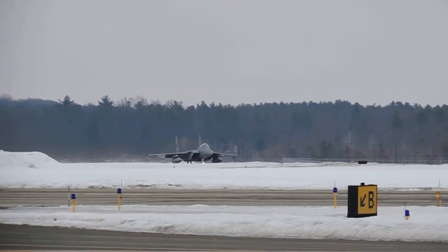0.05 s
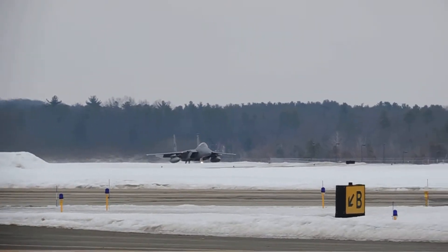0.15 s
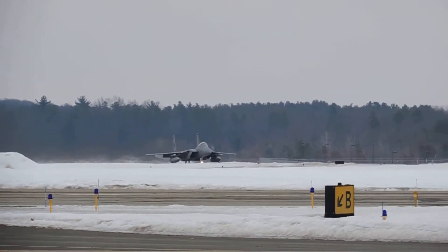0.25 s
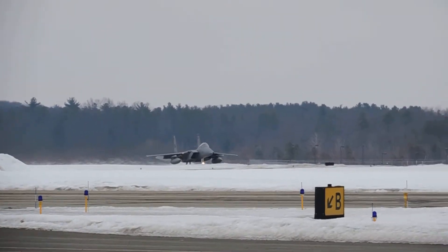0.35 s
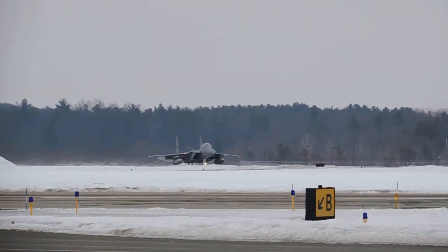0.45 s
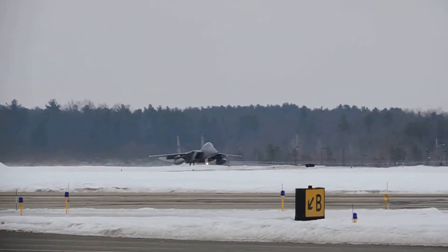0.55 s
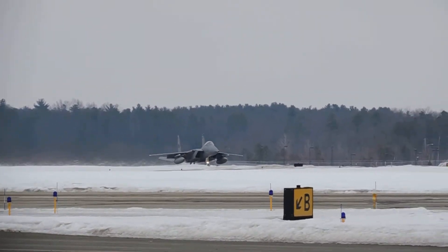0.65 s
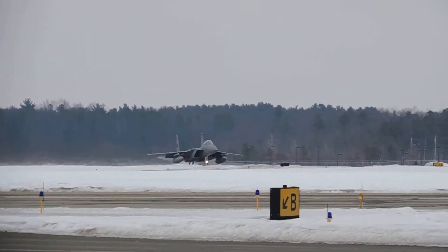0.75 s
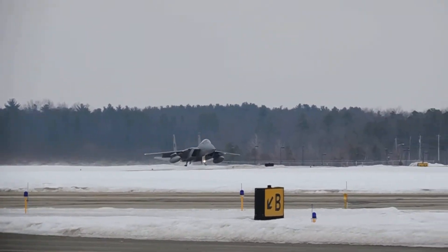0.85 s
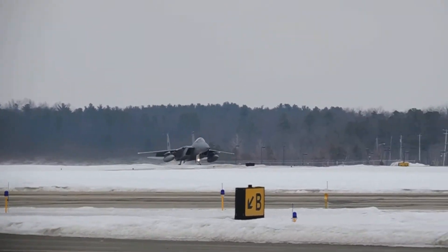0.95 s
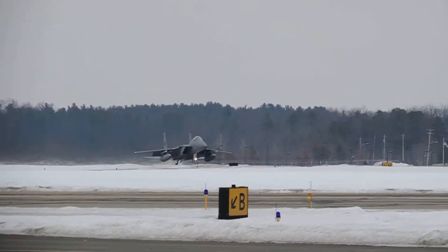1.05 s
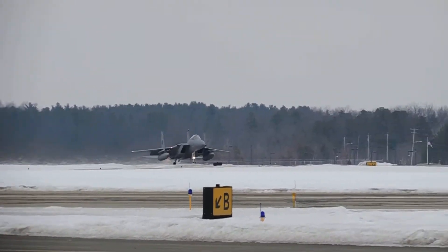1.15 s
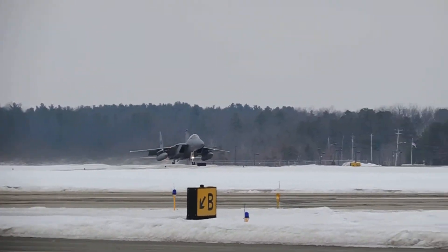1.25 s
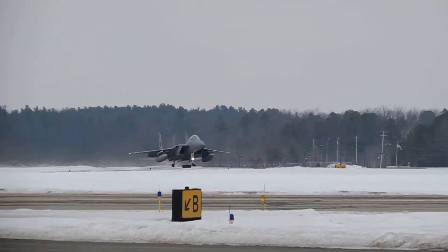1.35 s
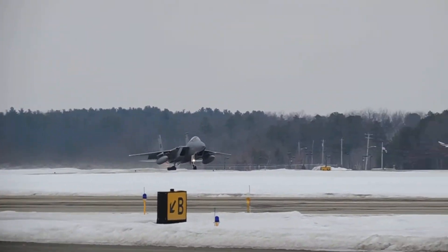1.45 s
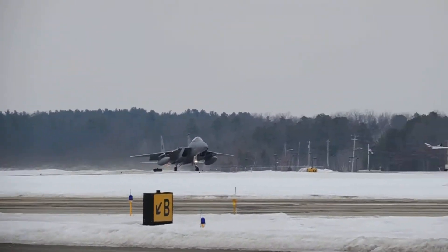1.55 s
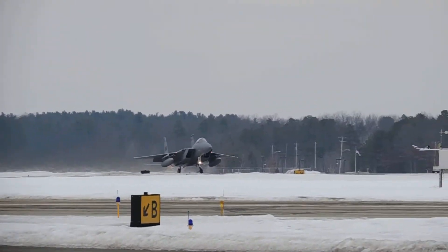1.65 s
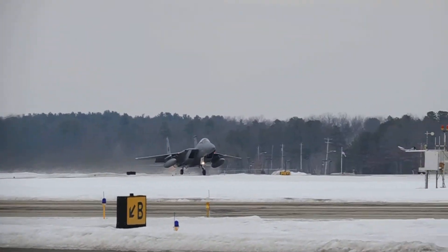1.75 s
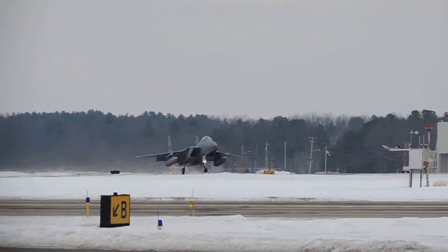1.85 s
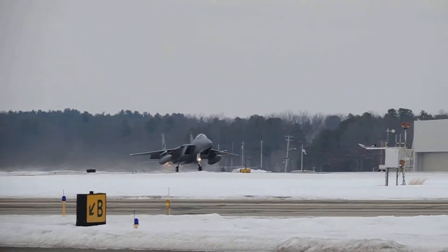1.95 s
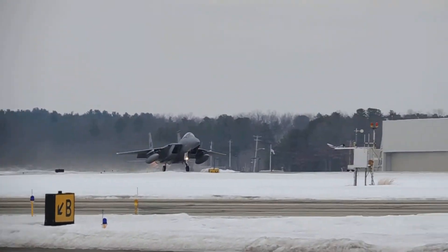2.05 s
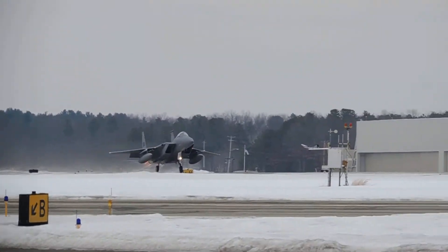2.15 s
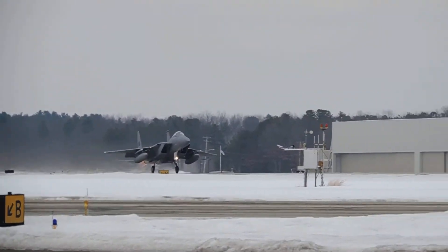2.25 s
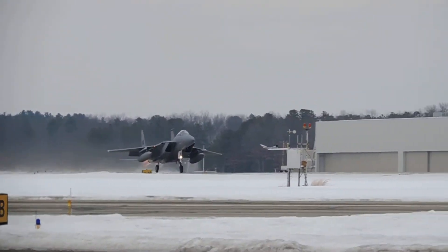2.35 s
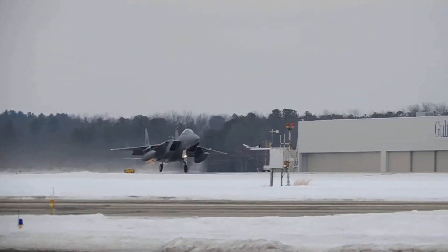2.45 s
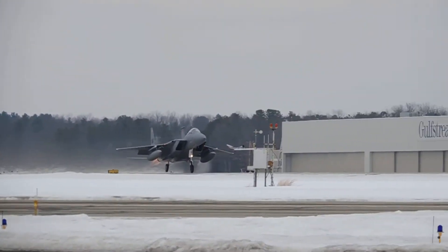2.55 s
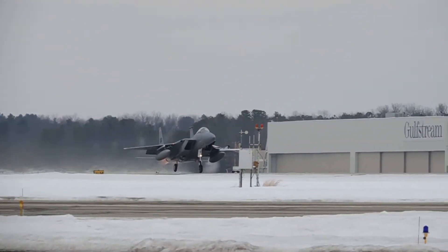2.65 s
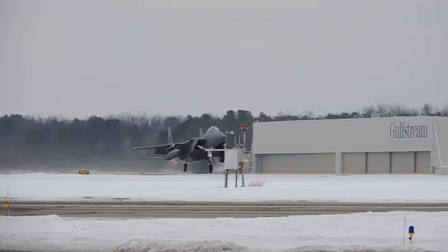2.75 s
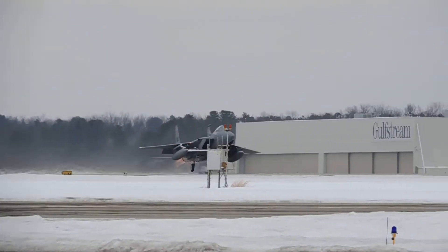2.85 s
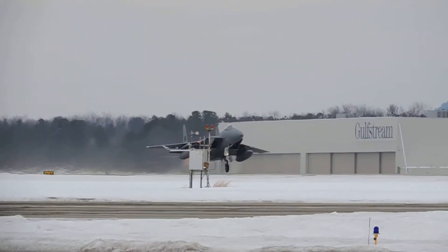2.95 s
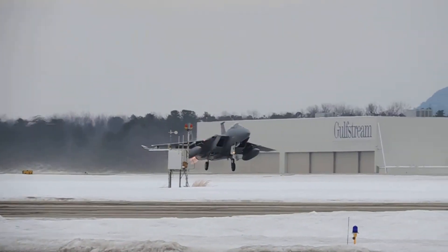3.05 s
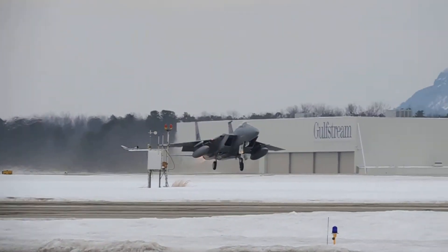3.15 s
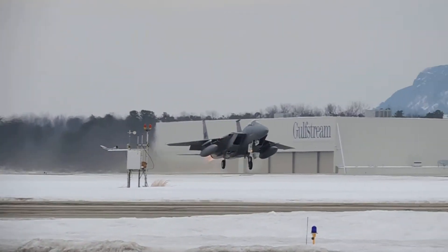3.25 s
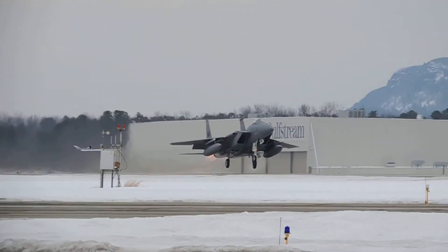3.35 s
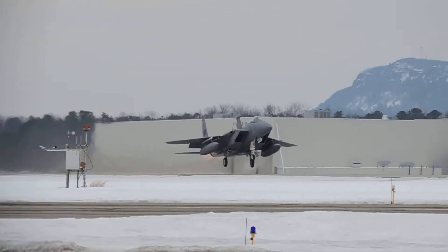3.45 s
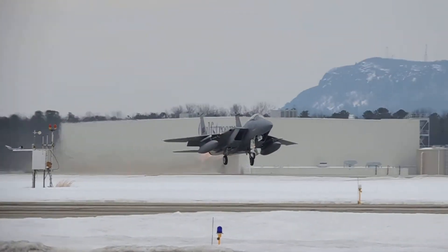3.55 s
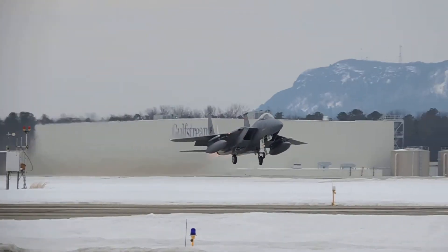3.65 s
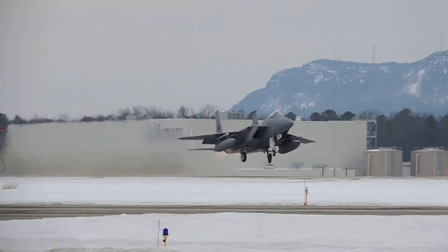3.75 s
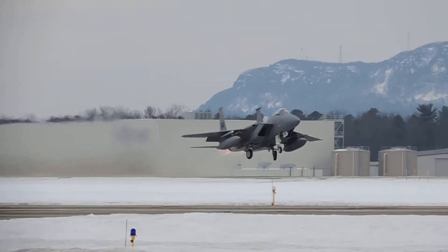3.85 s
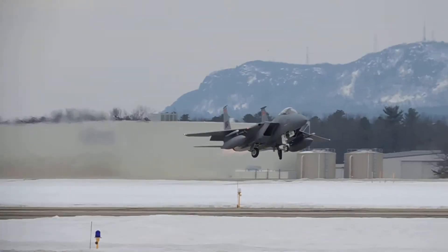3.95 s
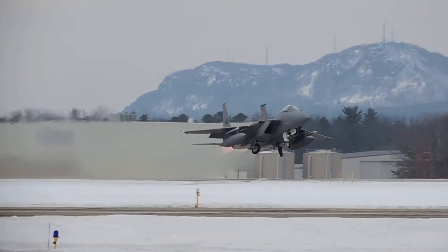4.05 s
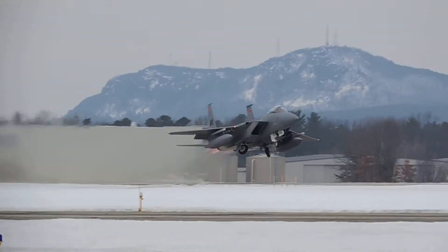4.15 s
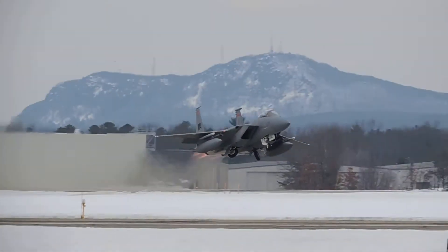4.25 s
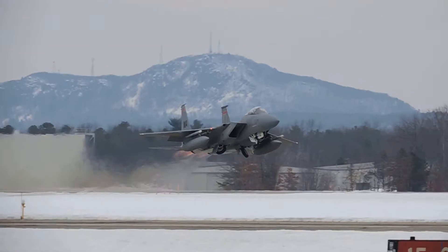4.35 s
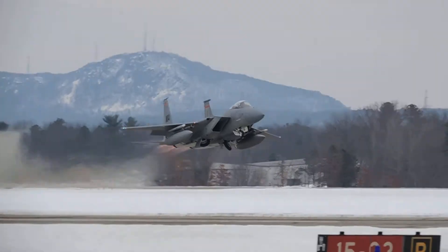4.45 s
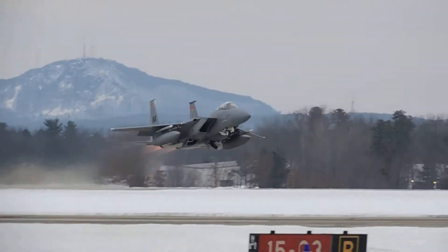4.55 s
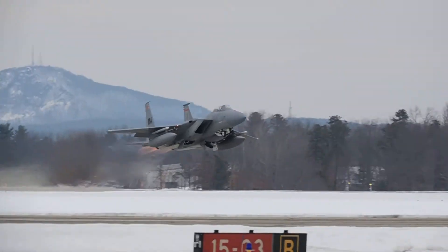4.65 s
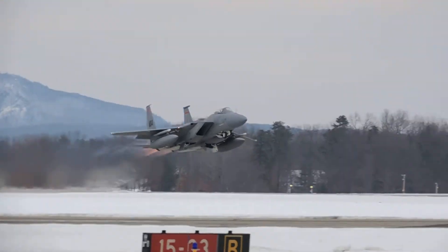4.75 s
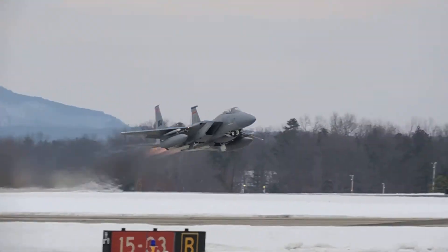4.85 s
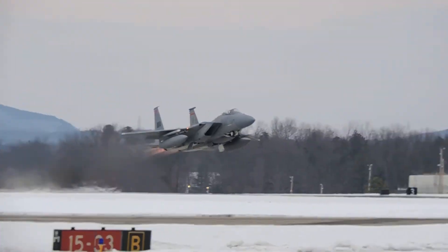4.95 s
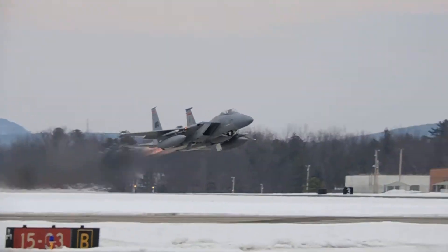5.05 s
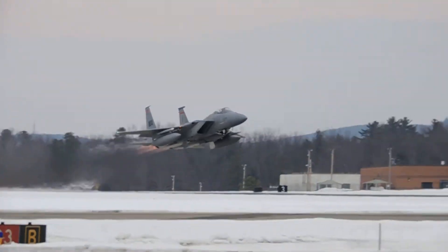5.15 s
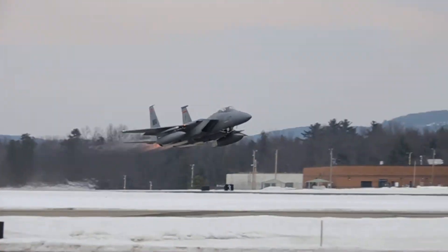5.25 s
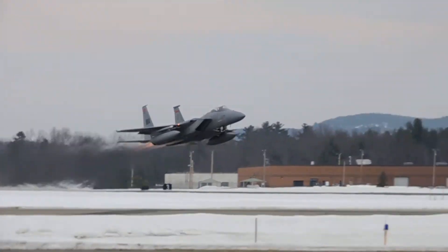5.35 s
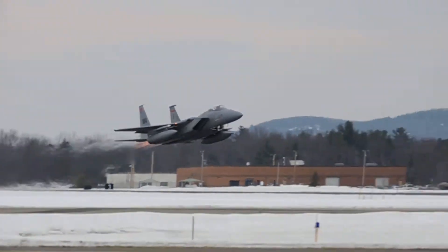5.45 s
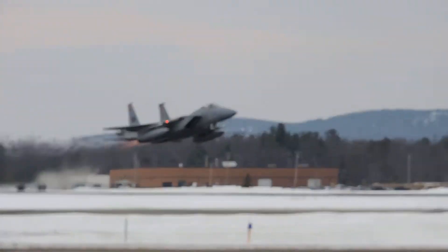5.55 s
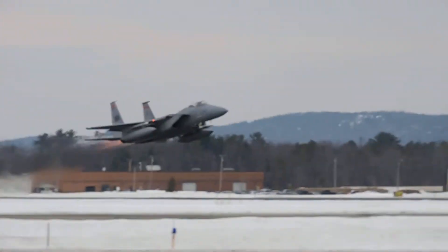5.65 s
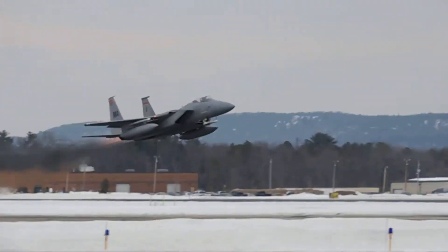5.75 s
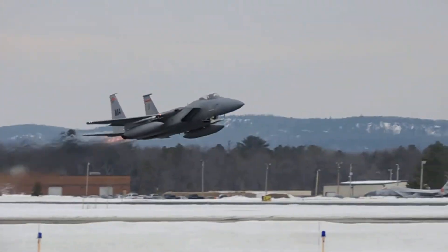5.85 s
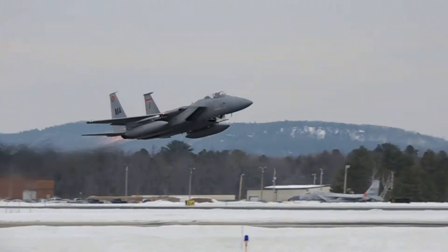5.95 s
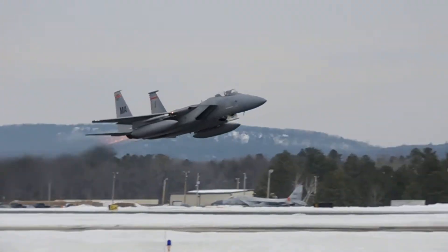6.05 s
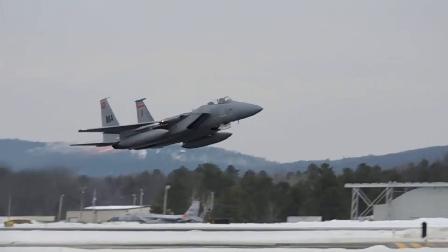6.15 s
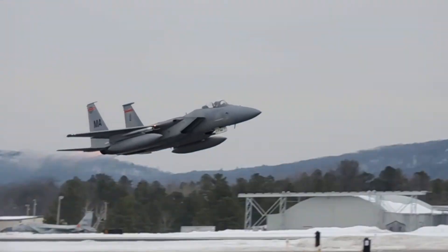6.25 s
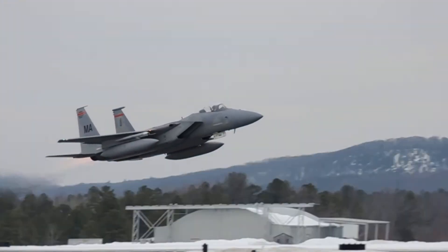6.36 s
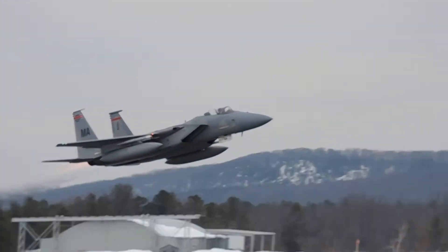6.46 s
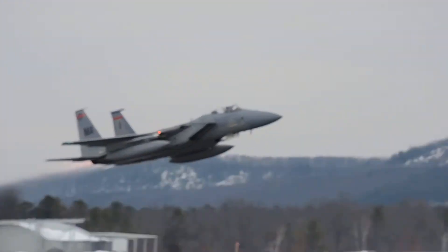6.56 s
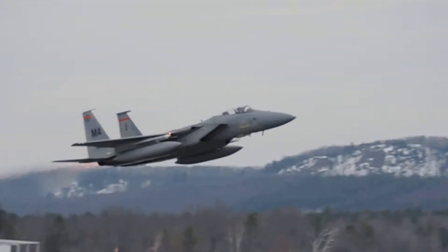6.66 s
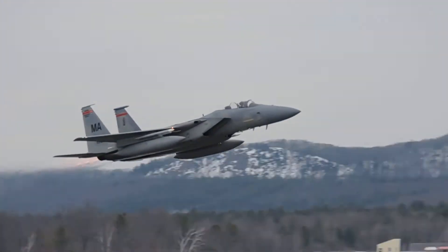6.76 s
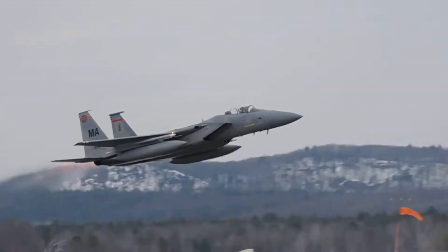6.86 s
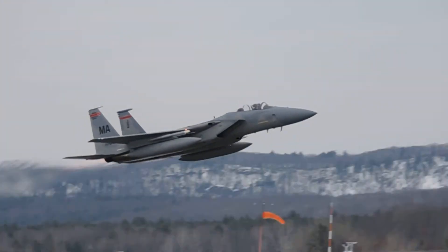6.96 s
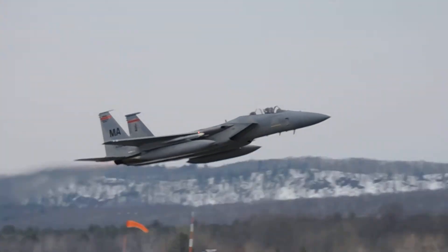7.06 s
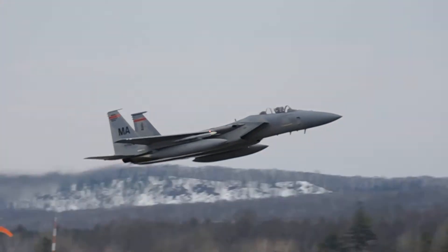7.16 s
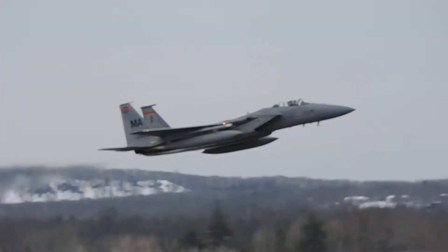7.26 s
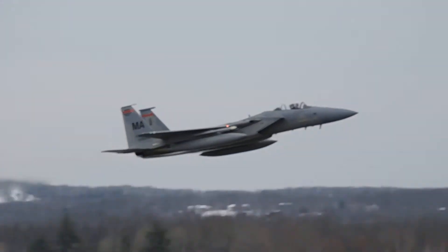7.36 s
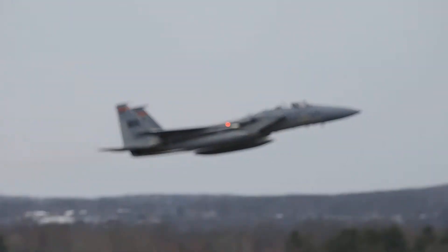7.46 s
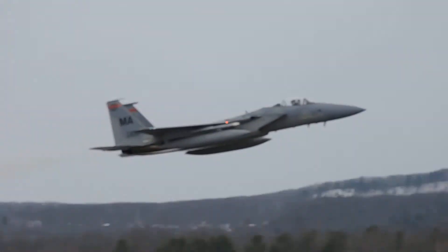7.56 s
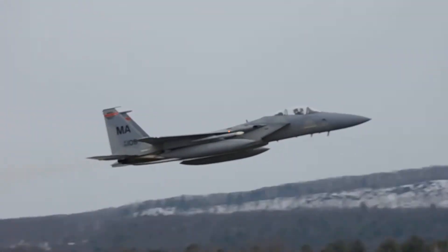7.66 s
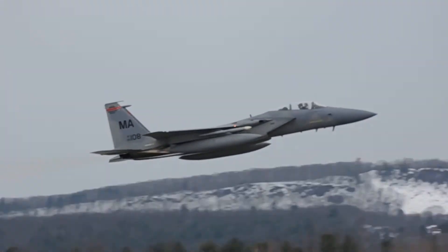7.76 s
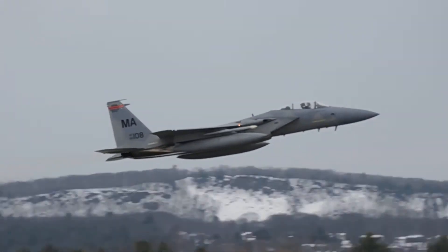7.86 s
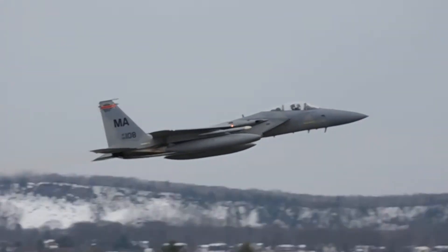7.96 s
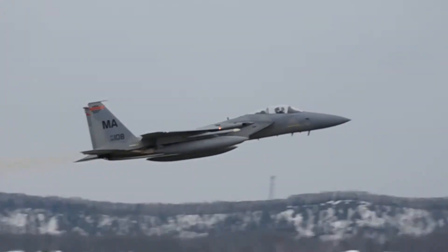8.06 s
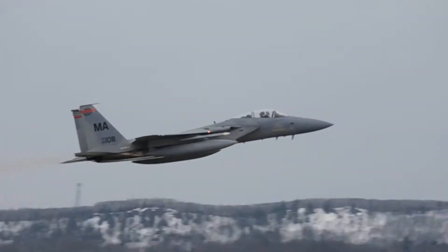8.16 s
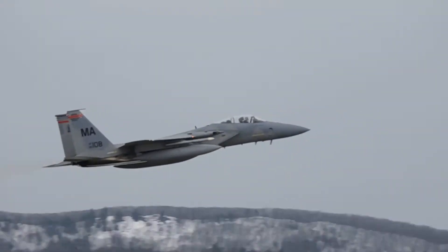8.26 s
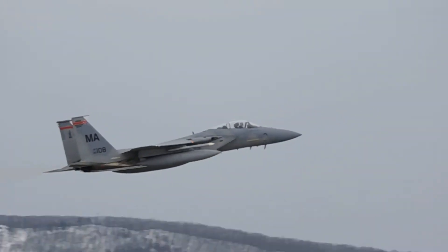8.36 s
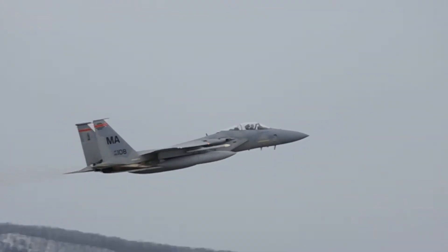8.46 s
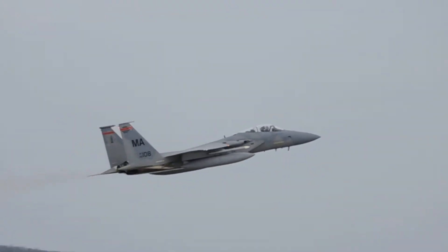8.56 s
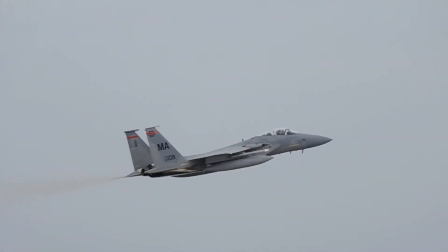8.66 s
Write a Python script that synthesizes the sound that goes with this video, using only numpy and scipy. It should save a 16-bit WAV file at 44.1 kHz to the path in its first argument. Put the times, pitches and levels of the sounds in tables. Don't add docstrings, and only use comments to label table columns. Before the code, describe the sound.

Outdoors beside an open runway, lumpy wind buffets a stereo microphone unevenly left and right while a fighter jet roars far off. The hollow mid-low roar steadily grows and brightens, with small snaps and thin clicks. As the jet passes, crackle, sizzle and deep rumble surge into a harsh overloaded blast, then begin to recede.

```python
import sys
import numpy as np
from scipy import signal
from scipy.fft import rfft, irfft, next_fast_len
from scipy.io import wavfile
from scipy.ndimage import uniform_filter1d, map_coordinates

SR = 44100
rng = np.random.default_rng(int(sys.argv[2]) if len(sys.argv) > 2 else 0)


def volts_from_decibels(level):
    exponent = np.asarray(level, float) / 20
    return 10 ** exponent


def inscribe(sig):
    pcm = np.round(np.clip(np.atleast_2d(sig).T, -1, 1) * 32767)
    wavfile.write(sys.argv[1], SR, pcm.astype(np.int16))


N = 383669
TIME = np.arange(N) / SR
FRAME = 2048
HZ = np.maximum(np.arange(FRAME // 2 + 1) * SR / FRAME, 1.0)

# (time [s], nearness [dB], ground hump [Hz], lift by the ground path [dB],
# focus of the hump [dB])
APPROACH = [(0, -44, 480, -1, -1.5), (.5, -45.5, 514, -4.5, 6.5), (1.1, -40, 414, 7.5, -10),
            (1.5, -37.5, 380, 1.5, -6), (2.2, -37.5, 412, -2, -8), (3.4, -36.5, 437, 0.5, -4.5),
            (3.85, -35, 434, -4.5, 4), (4.3, -32.5, 428, -1.5, -9.5), (5.0, -28, 404, 1, -7.5),
            (5.5, -28.5, 394, -3, -3), (5.9, -25.5, 382, -6, -3), (6.45, -25.5, 401, -2, -8.5),
            (7.0, -24.5, 452, 3, -10), (7.45, -17.5, 512, 3.5, -7), (7.85, -15.5, 616, -1.5, 0),
            (8.2, -17, 716, -13.5, -6), (8.45, -19, 900, 2.5, -8), (8.7, -20.5, 1076, -15, -11.5)]
# (time [s], exposure [0-1])
EXPOSURE = [(0, 0.14), (5.3, 0), (6.1, 0.1), (6.5, .25), (6.8, .5), (7.1, 0.84), (7.6, 0.92), (8.3, 0.93),
            (8.7, 0.86)]
# (time [s], jump [dB], click [dB], click left-right [dB])
GAIN_JUMPS = [
    (4.1678, -6.0, -26, 11.5),
    (5.854, 5, -29.5, 8),
    (6.238, -5.5, -34, -3),
    (7.7503, 7.5, -43.5, -6.5),
]


def columns(rows, at):
    s, *cols = np.transpose(rows)
    return [np.interp(at, s, c) for c in cols]


def over_hz(rows, hz):
    f, *cols = np.transpose(rows)
    return [np.interp(np.log(hz), np.log(f), c) for c in cols]


def layer(shape_db, level_db):
    power = volts_from_decibels(2 * shape_db)
    return power / power.mean(axis=0) * volts_from_decibels(2 * level_db)


def patches(shape, frames, bins):
    field = uniform_filter1d(rng.standard_normal(shape), size=frames, axis=1)
    field = uniform_filter1d(field, size=bins, axis=0)
    return field / field.std()


def shaped_noise(power_at):
    overlap = FRAME * 3 // 4
    hz, s, frames = signal.stft(rng.standard_normal(N), SR, nperseg=FRAME, noverlap=overlap)
    shaped = frames * np.sqrt(power_at(s))
    return signal.istft(shaped, SR, nperseg=FRAME, noverlap=overlap)[1][:N]


def high_pass(x, order, hz):
    return signal.sosfilt(signal.butter(order, hz, "high", fs=SR, output="sos"), x)


def wind():
    # (frequency [Hz], left [dB per Hz], right [dB per Hz])
    wind_shape = [(12, -25.5, -10.5), (30, -7, 0), (101, -2.5, 2), (213, -0.2, 1), (350, -3.5, -7.5),
                  (595, -10, -21.5), (990, -20, -27.5), (2020, -39, -58), (3450, -82, -82.5),
                  (8000, -120, -120)]
    # (time [s], gust level [dB], lean to the left port [dB])
    gusts = [(0, -20.5, 8), (.2, -21.5, 2), (.55, -19, 3.5), (1.0, -22.5, 4), (1.5, -23, 7.5),
             (1.75, -22, 9), (2.2, -19, 5.5), (2.45, -22.5, 6.5), (2.8, -17.5, 0), (3.05, -21.5, 1.5),
             (3.4, -23, 9.5), (4.0, -24.5, 12), (4.55, -23.5, 4.5), (5.0, -31, 11.5), (5.6, -27.5, 13.5),
             (6.05, -24, 7.5), (6.7, -30.5, 7.5), (8.7, -57, -2)]
    ports = []
    for port_shape, side in zip(over_hz(wind_shape, HZ), (.5, -.5)):
        def power_at(s):
            gust_db, lean_db = columns(gusts, s)
            power = layer(port_shape[:, None], gust_db + side * lean_db + 1.87)
            return power * volts_from_decibels(2 * 0.61 * patches(power.shape, frames=3, bins=31))
        ports.append(shaped_noise(power_at))
    return np.array(ports)


def jet():
    return at_ports(steepened(shaped_noise(roar_power)) + crackle() + sizzle())


def roar_power(s):
    # (frequency [Hz], level [dB per Hz])
    rumble_shape = [(15, -23), (40, -5), (100, -7), (200, -3), (300, -3), (450, -4.5), (900, -71.5),
                    (3000, -120)]
    shoulder_shape = [(200, -72), (500, 7), (850, 3), (1150, -0.5), (1500, -1.4), (1950, -9.5), (2400, -20),
                      (3000, -46.5), (5000, -77), (9000, -130)]
    top_shape = [(500, -56.5), (1200, -0.5), (2300, -5.3), (3000, -3.5), (4000, -38), (5500, -29.5),
                 (8000, -63), (16000, -110)]
    # (multiple of hump frequency [1], level [dB per Hz])
    hump_shape = [(.2, -83), (.4, -36), (.7, -3.5), (.82, 1.5), (.95, -1.35), (1.3, -1.5), (1.55, -6.5),
                  (1.8, -12), (2.1, -31.5), (4, -63.5), (9, -120)]
    near_db, ridge_hz, lift_db, focus_db = columns(APPROACH, s)
    hump_db = 1.0 + 0.59 * near_db + lift_db
    top_db = 4.5 + 1.74 * near_db
    fade_db = 7.5 * np.maximum(s - 7.75, 0)
    rumble_db = -47 + 31 * columns(EXPOSURE, s)[0] - fade_db

    rise = np.maximum(ridge_hz / 620, 1) ** .6
    ridge_octaves = .2 * rise ** 2.9
    from_ridge = np.log2(HZ[:, None] / ridge_hz) / ridge_octaves
    ridge_shape_db = -np.minimum(6 * from_ridge ** 2, 150)

    power = layer(over_hz(hump_shape, HZ[:, None] / (1.06 * ridge_hz))[0], hump_db - 5.0)
    power = power + layer(ridge_shape_db, hump_db + focus_db)
    power = power + layer(over_hz(shoulder_shape, HZ[:, None] / rise)[0], near_db)
    power = power + layer(over_hz(rumble_shape, HZ)[0][:, None], rumble_db)
    power = power + layer(over_hz(top_shape, HZ)[0][:, None], top_db)
    flicker_db = .8 * patches(power.shape, frames=2, bins=41)
    patchy_db = 2.1 * patches(power.shape, frames=9, bins=9)
    return power * volts_from_decibels(2 * (flicker_db + patchy_db))


def steepened(wave):
    shift = 6.5 * np.tanh(wave / .5)
    return map_coordinates(wave, [np.arange(N) - shift], order=3, mode="nearest")


def at_ports(sound):
    # (frequency [Hz], left-right level [dB], left lead [rad])
    port_colour = [(60, 2.5, 0.97), (250, 2, 0.22), (485, 4.5, 0.74), (680, 10, -0.19), (1340, 7.5, -0.44),
                   (2070, 3.5, -0.88), (2460, 0, -0.9), (3080, 0.5, 0.51), (6000, 5, 0.49),
                   (12000, 5.5, 0.47)]
    # (time [s], lead [samples])
    swing = [(0, 0.01), (4.5, .3), (6, 1.2), (7, 2.6), (8.7, 3.0)]
    size = next_fast_len(N + FRAME)
    hz = np.maximum(np.arange(size // 2 + 1) * SR / size, 1.0)
    tilt_db, lead = over_hz(port_colour, hz)
    half = volts_from_decibels(tilt_db / 2) * np.exp(.5j * lead)
    spectrum = rfft(sound, size)
    left, right = (irfft(spectrum * h, size)[:N] for h in (half, 1 / half))
    late = np.arange(N) - columns(swing, TIME)[0]
    right = map_coordinates(right, [late], order=3, mode="nearest")
    delayed = np.pad(sound, (301, 0))[:N]
    scattered = volts_from_decibels(-7.0) * high_pass(delayed, 2, 3200)
    return np.array([left + scattered, right - scattered])


def crackle():
    exposure = columns(EXPOSURE, TIME)[0]
    fronts_per_s = 190 * volts_from_decibels(20 * exposure)
    clumps = np.repeat(patches((1, N // 256 + 1), frames=4, bins=1)[0], 256)[:N]
    born = rng.random(N) < fronts_per_s * volts_from_decibels(5.0 * clumps) / SR
    near_db = -5.5 + 1.395 * columns(APPROACH, TIME)[0]
    spread_db = 4.0 * np.minimum(rng.exponential(1, N), 4)
    swing_db = 12.5 * np.sin(np.pi * exposure) ** 2
    fronts = born * volts_from_decibels(near_db + spread_db + swing_db)
    bright = rng.random(N) ** 3
    return front(fronts, hz=2940) + volts_from_decibels(-7) * front(fronts * bright, hz=7000)


def front(clicks, hz):
    r = np.exp(-2 * np.pi * hz / SR)
    rounded = signal.lfilter([3 * (1 - r) ** 2], np.poly([r, r, r, r]), clicks + 1e-18) * (1 - r)
    return -high_pass(rounded, 2, 1500)


def cracks():
    # (time [s], peak [dB], left-right [dB])
    lone_fronts = [(0.136, -61, -1), (0.513, -61.5, 11), (0.689, -59.5, 6.5), (0.82, -62.5, 10),
                   (0.9522, -63.5, 2), (1.2272, -62, 7), (1.5004, -63.5, 7), (1.5464, -64, 6),
                   (1.698, -62.5, 5), (1.7846, -59, 10.5), (2.173, -59, 11), (2.8566, -64.5, -5),
                   (3.721, -57, 4), (3.97, -60.5, 13), (4.3244, -53.5, 0), (4.415, -48.5, -2),
                   (4.4526, -49.5, 10.5), (4.9518, -47.5, -5), (5.013, -43.5, 8), (5.028, -46, -7),
                   (5.246, -44, -3), (6.1337, -40, -1), (6.4073, -41.5, -1), (6.4532, -48, -3),
                   (6.574, -43, 2), (6.684, -34, -7), (6.708, -35.5, 4), (6.783, -42.5, 0),
                   (6.856, -43, 27), (7.0255, -29.5, -1)]
    s, peak_db, pan_db = np.transpose(lone_fronts)
    port_db = peak_db + pan_db * [[.5], [-.5]]
    sharp, dull = np.zeros((2, 2, N))
    lags = rng.uniform(0, .032, (len(s), 3))
    losses_db = rng.uniform(-14.5, 0, (len(s), 3))
    for k in range(4):
        lag = lags[:, k - 1] if k else 0
        loss_db = losses_db[:, k - 1] if k else 0
        at = ((s + lag) * SR).astype(int)
        sharp[:, at] += volts_from_decibels(port_db + loss_db + 2.0)
        dull[:, at] += volts_from_decibels(port_db + loss_db + 23.5)
    return front(sharp, hz=6530) + front(dull, hz=3800)


def switch_clicks():
    s, jump_db, click_db, pan_db = np.transpose(GAIN_JUMPS)
    clicks = np.zeros((2, N))
    at = ((s - .001) * SR).astype(int)
    clicks[:, at] = volts_from_decibels(click_db + pan_db * [[.5], [-.5]])
    return signal.lfilter([1], [1, -.7], clicks + 1e-18)


def sizzle():
    # (frequency [Hz], level [dB per Hz])
    sizzle_shape = [(1500, -42.5), (3500, -15.5), (6000, 9.5), (12500, -7), (16000, -27)]
    shape_db = over_hz(sizzle_shape, HZ)[0][:, None]
    bright = shaped_noise(lambda s: layer(shape_db, -94.5 + 61.5 * columns(EXPOSURE, s)[0]))
    slow, fast = (patches((1, N // 64 + 2), frames=span, bins=1)[0] for span in (41, 5))
    burst_db = np.interp(np.arange(N) / 64, np.arange(len(slow)), 2.6 * slow + 3.5 * fast)
    depth = 1.4 - 0.2 * np.clip(columns(EXPOSURE, TIME)[0], 0, 1)
    return bright * volts_from_decibels(depth * burst_db)


def scene():
    return wind() + jet() + cracks()


def overloaded(dry):
    load = np.clip(columns(EXPOSURE, TIME)[0], 0, 1) ** 2.7
    ceiling = np.outer((0.62, 0.97), 1 - load) + np.outer((0.35, 0.18), load)
    hardness = 6.0
    return dry / (1 + np.abs(dry / ceiling) ** hardness) ** (1 / hardness)


def band_limit(x):
    return signal.sosfilt(signal.butter(12, 15710, fs=SR, output="sos"), x)


def record(dry):
    hiss = volts_from_decibels(-80.5) * signal.lfilter([1], [1, -.6], rng.standard_normal(dry.shape))
    tilted = high_pass(overloaded(dry) + hiss, 1, 25.0)
    housed = tilted + 0.6 * signal.lfilter(*signal.iirpeak(1770, 3, SR), tilted)
    gain_db = sum(db * np.clip((TIME - s) / 0.00073, 0, 1) for s, db, *click in GAIN_JUMPS)
    opening = np.minimum(.55 + TIME / .004, 1)
    return band_limit(housed * volts_from_decibels(gain_db) * opening + switch_clicks())


dry = scene()
out = record(dry)
inscribe(out)
```